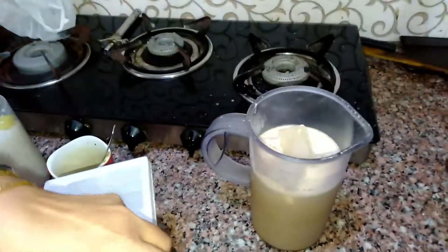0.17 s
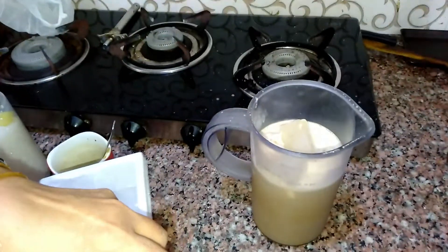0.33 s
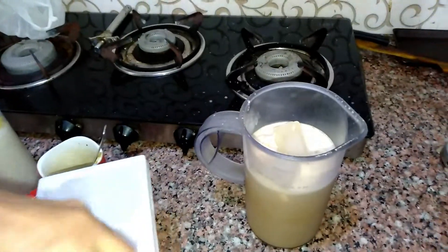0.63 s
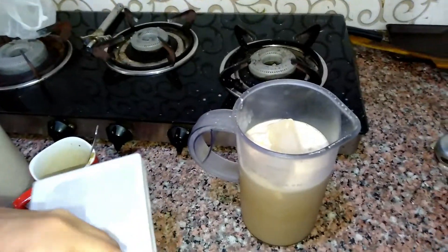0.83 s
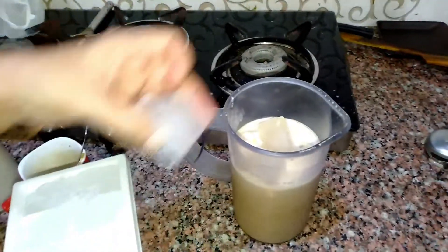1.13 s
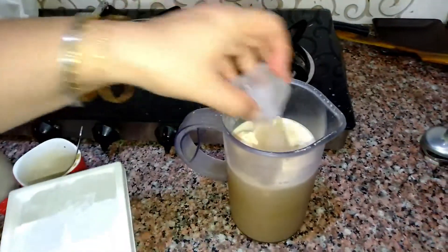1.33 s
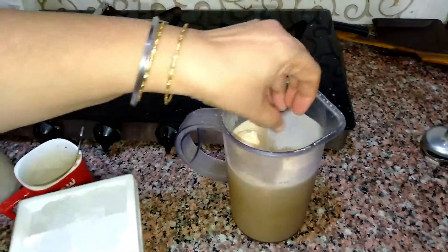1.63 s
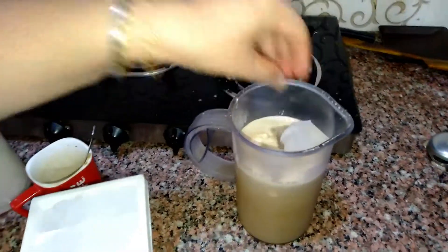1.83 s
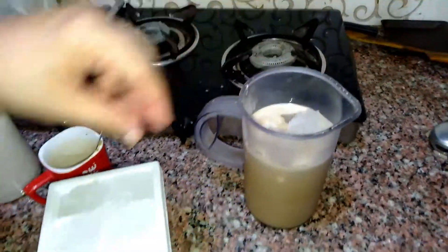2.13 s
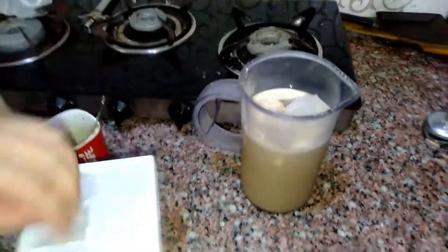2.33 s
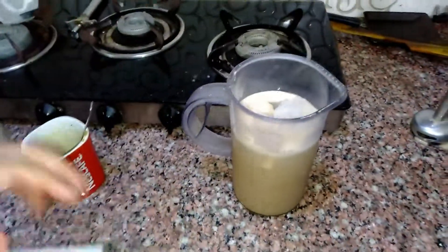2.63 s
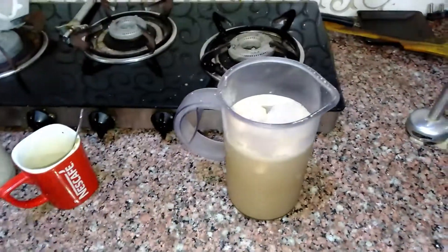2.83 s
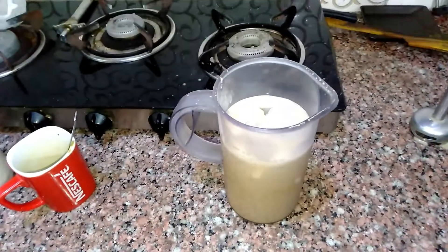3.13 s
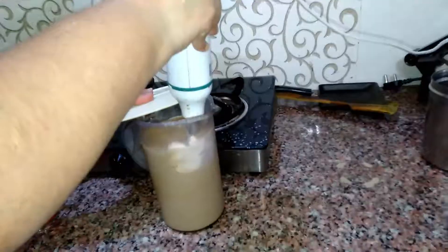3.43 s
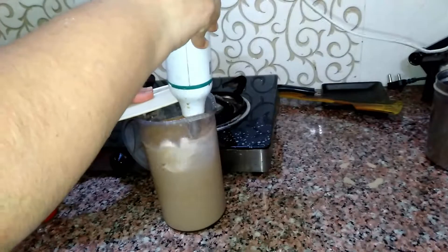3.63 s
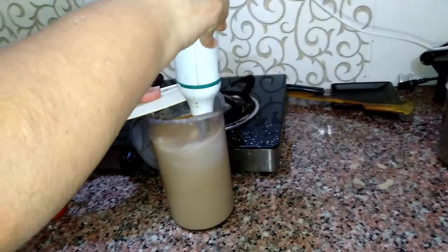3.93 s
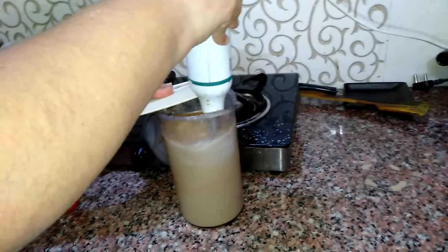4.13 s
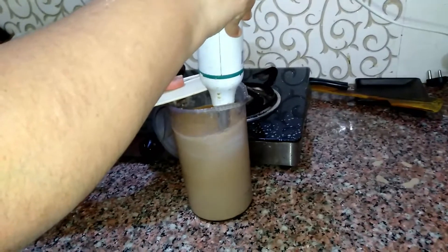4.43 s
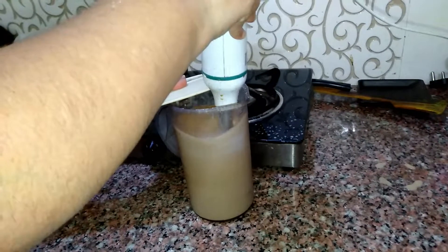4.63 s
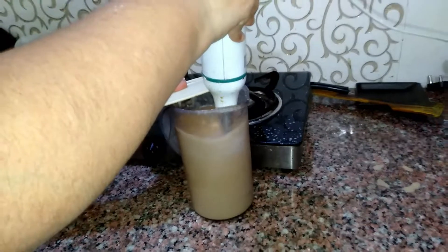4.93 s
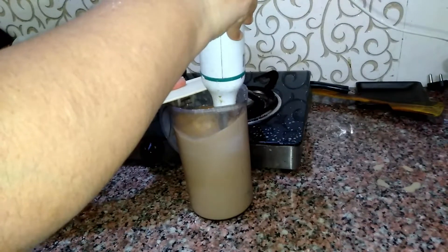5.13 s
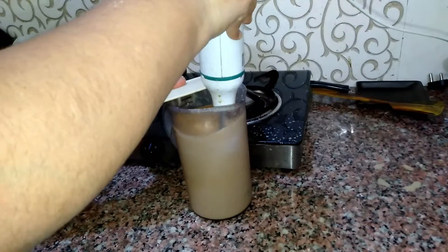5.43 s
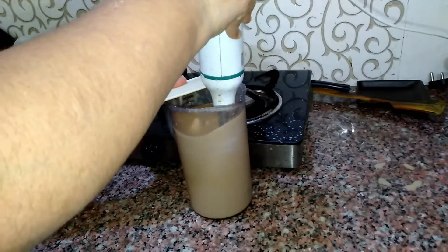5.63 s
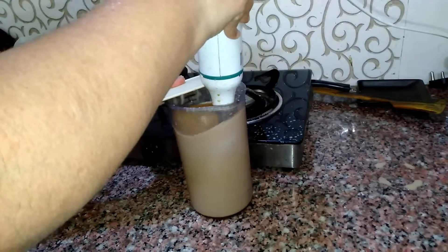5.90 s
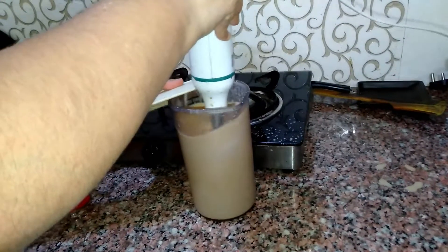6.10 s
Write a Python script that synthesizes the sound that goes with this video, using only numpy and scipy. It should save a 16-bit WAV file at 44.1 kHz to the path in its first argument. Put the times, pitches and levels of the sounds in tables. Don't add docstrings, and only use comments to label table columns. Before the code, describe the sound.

A home kitchen with hard tiled walls, heard close through a small microphone with edgy treble. From 0 to 0.7 seconds fingers rub wet plastic and dig out ice: scattered sharp cracks, brightest and densest between 0.3 and 0.55, with tiny glassy splinters. Quiet fumbling and faint clatter follow, over low room noise and weak wavering hums. At about 1.62 to 1.7 a cube drops into the jug with a short hollow double knock. Bangles brush faintly; a tray slides and bumps softly near 2.7, then taps quickly at 3.2 to 3.3. At 3.37 a hard cut: a hand blender is already running, loud and continuous, a buzzing motor whine around 210 hertz with strong overtones above a thick roar of churned liquid and fine ice ticking. It wavers and slows slightly, then sags and roughens abruptly at 6.03, still running to the end at about 6.3.

```python
import sys
import numpy as np
from scipy import signal
from scipy.fft import rfft, irfft
from scipy.io import wavfile
from scipy.ndimage import uniform_filter1d

SR = 44100
rng = np.random.default_rng(int(sys.argv[2]) if len(sys.argv) > 2 else 0)


def voltage_ratio(level):
    return 10 ** (np.asarray(level, float) / 20)


def transcribe(u):
    v = np.clip(np.atleast_2d(u).T, -1, 1)
    q = np.round(v * 32767).astype(np.int16)
    wavfile.write(sys.argv[1], SR, q)


N = 276149
T = np.arange(N) / SR
MAINS_RIPPLE_HZ = 100

# t/s, grip of shaft on jug/dB, churning effort/dB
BLENDER_WORK = [(3.37, -7, -18), (3.68, 1.5, -16.5), (3.81, -18, -15.5), (4.05, 3.5, -17.5), (4.16, 0, -17),
                (4.33, -4.5, -16.5), (4.47, 3, -19), (4.76, 3, -17.5), (4.91, 6, -20.5), (5.1, -1, -16.5),
                (5.35, 0.5, -17), (5.57, 4, -20.5), (5.76, 2.5, -17.5), (5.99, 5, -19.5), (6.04, -2, -18.5),
                (6.15, -3.5, -16), (6.26, -13, -18)]


def evened(x):
    return x / np.sqrt(np.mean(x ** 2) + 1e-20)


def read(points, hz):
    f, value = np.transpose(points)
    return np.interp(np.log(hz + 1), np.log(f + 1), value)


def curves(rows):
    s, *columns = np.transpose(rows)
    return [np.interp(T, s, c) for c in columns]


def add(mix, s, sound):
    part = mix[round(s * SR):][:len(sound)]
    part += sound[:len(part)]


def band(x, lo_hz, hi_hz):
    sos = signal.butter(2, [lo_hz, min(hi_hz, SR / 2.1)], "band", fs=SR, output="sos")
    return signal.sosfilt(sos, x)


def drift(rate_hz):
    count = int(N / SR * 60) + 2
    f = np.fft.rfftfreq(count, 1 / 60)
    slow = irfft(rfft(rng.standard_normal(count)) / np.sqrt(1 + (f / rate_hz) ** 4), count)
    return np.interp(T, np.arange(count) / 60, evened(slow))


def hiss(spectrum, patchy_db, streaky_db, peaks=()):
    frames, hz = N // 512 + 5, np.fft.rfftfreq(2048, 1 / SR)
    a, b, patches, streaks = rng.standard_normal((frames, 1025, 4)).T
    patches = uniform_filter1d(patches, size=14, axis=0)
    patches = evened(uniform_filter1d(patches, size=8, axis=1))
    streaks = evened(uniform_filter1d(streaks, size=20, axis=1))
    peaks_db = sum(db / (1 + (2 * (hz - f) / width) ** 2) for f, width, db in peaks)
    shape_db = read(spectrum, hz) + peaks_db
    z = (a + 1j * b) * voltage_ratio(shape_db[:, None] + patchy_db * patches + streaky_db * streaks)
    return signal.istft(z, nperseg=2048, noverlap=1536)[1][:N]


def kitchen():
    # f/Hz, level/dB
    room = [(12, -29), (20, -29), (49, -0.5), (274, -17), (532, -13), (621, -16.5), (1030, -19.5),
            (1180, -9.5), (1380, -12.5), (1480, -58), (1880, -13), (2570, -43), (4000, -22.5), (5200, -39),
            (8800, -120)]
    # t/s, level/dB
    rumble = [(0, -58.5), (1, -54), (2, -56.5), (3, -52.5), (3.3, -50)]
    # start/s, end/s, f/Hz, level/dB
    hums = [(0.3, 1.557, 223.7, -63), (0.298, 1.5, 563, -59), (1.907, 3.1, 1145, -59.5),
            (1.8, 3.2, 1250, -62), (2.2, 3.2, 1330, -61), (2.2, 3.2, 1405, -62), (.07, 0.178, 422, -48.5),
            (1.786, 3.3, 216.4, -65)]
    out = voltage_ratio(-54.5) * evened(hiss(room, 2.0, 3.5))
    out += voltage_ratio(curves(rumble)[0]) * evened(band(rng.standard_normal(N), 16.5, 33.4))
    for start, end, hz, db in hums:
        swell = np.clip(np.minimum(T - start, end - T) / 0.035, 0, 1)
        high = hz > 1000
        level_db = db - 1.0 + (3 + 2.5 * high) * drift(7)
        phase = 2 * np.pi * hz * T + (.6 + .9 * high) * drift(8.2)
        out += swell * voltage_ratio(level_db) * np.cos(phase)
    return out


def rubbing():
    # t/s, level/dB
    pressure = [(0.0, -48.5), (0.19, -49.5), (0.4, -42), (0.51, -34), (0.6, -39), (0.72, -50),
                (1.02, -53.5), (1.6, -51), (1.8, -56), (2.3, -52.5), (3.0, -54), (3.37, -52)]
    bright_db = curves(pressure)[0]
    over_rest_db = bright_db + 54.5
    dull_db = -53 + 0.86 * over_rest_db
    flicker_db = np.array([
        np.clip(9.0 + 0.24 * over_rest_db, 0, 9) * np.minimum(drift(30), 1.6),
        4.5 * np.minimum(drift(17), .9),
        1.0 * drift(30),
        3.9 * drift(15)])
    grains = rng.standard_normal((4, N)) * voltage_ratio(flicker_db)
    bright = evened(band(grains[0], 4200, 14300))
    bright += voltage_ratio(5.5) * evened(band(grains[2], 2700, 21000))
    bright += evened(band(grains[2], 9600, 18600))
    dull = evened(band(grains[1], 800, 1700)) + evened(band(grains[3], 1370, 2760))
    return voltage_ratio(bright_db - 12.0) * bright + voltage_ratio(dull_db - 8.0) * dull


def splinters():
    # t/s, peak level/dB
    ticks = [(0.0456, -31), (0.3108, -31), (0.3238, -15), (0.3308, -11.5), (0.3407, -21), (0.3647, -11),
             (0.4003, -12), (0.4219, -25), (0.4635, -21), (0.5158, -17.5), (0.5301, -5.5), (0.5435, -13),
             (0.6568, -31), (0.7374, -35), (0.7516, -31), (1.1851, -29)]
    out, t = np.zeros(N), np.arange(1500) / SR
    decay = voltage_ratio(-60 * t / .0028) + voltage_ratio(-22 - 60 * t / .05)
    for s, db in ticks:
        tick = band(rng.standard_normal(len(t)) * decay, 9000, 15000)
        add(out, s + .0012, voltage_ratio(db - 1.5) * tick / abs(tick).max())
    return out


def knocks():
    # t/s, peak level/dB, ring f/Hz, rattle level/dB
    ice_cracks = [(0.0493, -17, 2700, -9.5), (0.1591, -37, 1300, 2.5), (0.196, -15.5, 1230, -1),
                  (0.3233, -11, 2540, -12), (0.3312, -12, 2590, -12), (0.3424, -17.5, 2300, 2.5),
                  (0.3467, -26, 2650, 2), (0.3495, -17.5, 1920, 0.5), (0.4, -6.5, 2690, -24),
                  (0.4222, -20, 2350, -7), (0.426, -7, 2930, -20), (0.4307, -23, 1960, -7),
                  (0.443, -24, 1680, -17), (0.4634, -30, 1080, -14), (0.5306, -18, 1600, -5),
                  (0.54, -23, 1920, 4.5), (0.5443, -7, 2950, -15.5), (0.574, -20, 1310, -16),
                  (0.67, -31, 1790, 2)]
    # t/s, peak level/dB, ring f/Hz, body level re snap/dB
    cube_bumps = [
        (0.365, -11.5, 2450, -6.5),
        (0.5676, -21, 1480, -5.5),
        (1.3973, -52, 1310, 5),
        (1.619, -35.5, 1060, 4.5),
        (1.642, -39, 1040, -9),
        (1.6852, -16, 960, -6),
        (1.765, -42, 1290, 0),
        (2.7105, -32.5, 1890, -4),
        (3.28, -32, 2090, -19),
    ]
    middling_db, bump_top_db, bump_rattle_db = -18, -13, -13
    ping_hz, ping_t60_s, ping_db = 6860, 0.0073, 1.5
    out, t = np.zeros(N), np.arange(7000) / SR
    rows = [(s, db, hz, -18.5 - 0.28 * (db - middling_db), -15 - 0.085 * (db - middling_db), rattle_db)
            for s, db, hz, rattle_db in ice_cracks]
    rows += [(*row, bump_top_db, bump_rattle_db) for row in cube_bumps]
    for s, snap_db, hz, body_db, top_db, rattle_db in rows:
        noise = rng.standard_normal(len(t))
        flicker = evened(uniform_filter1d(rng.standard_normal(len(t)), size=70))
        crackle = voltage_ratio(rattle_db - 60 * t / 0.073 + 4.6 * np.minimum(flicker, 1.7))

        snap = evened(band(noise, 3240, 8900))
        snap += voltage_ratio(top_db + 16.5) * evened(band(noise, 10200, 21000))
        tick = t / .0004 * np.exp(1 - t / .0004)
        tick *= 1.9 / abs(snap * tick).max()

        modes_hz = hz * np.array([0.98, 0.79, 1.46, 1.87]) * rng.uniform(1.0, 1.04, 4)
        blow = sum(np.sin(2 * np.pi * f * t) for f in modes_hz)
        blow *= voltage_ratio(-60 * t / .009) * np.minimum(t / .0006, 1)
        blow += voltage_ratio(4.5) * crackle * evened(band(noise, 0.79 * hz, 1.58 * hz))

        ping = np.sin(2 * np.pi * ping_hz * rng.uniform(0.937, 1.066) * t)
        ping *= voltage_ratio(ping_db - 60 * t / ping_t60_s) * np.minimum(t / 0.00061, 1)

        knock = voltage_ratio(snap_db - 8.5) * (snap * (.5 * tick + crackle) + ping)
        knock += voltage_ratio(snap_db + body_db + 1.0) * blow
        add(out, s + 0.00066, knock)
    return out


def taps():
    # t/s, peak level/dB
    fumbles = [
        (0.159, -41),
        (0.4264, -31),
        (1.1854, -53),
        (1.3987, -48),
    ]
    # t/s, peak level/dB
    scrapes = [
        (2.6703, -52),
        (2.7117, -29),
    ]
    # t/s, peak level/dB
    tray_taps = [
        (3.225, -42),
        (3.2343, -36),
        (3.247, -31),
        (3.259, -29),
        (3.2676, -28),
        (3.2755, -29),
        (3.2807, -28),
    ]
    t60_s = .007
    out, t = np.zeros(N), np.arange(600) / SR
    for s, db in tray_taps + scrapes + fumbles:
        tap = band(rng.standard_normal(len(t)), 1400, 4000) * voltage_ratio(-60 * t / t60_s)
        add(out, s + 0.00099, voltage_ratio(db - 1) * tap / abs(tap).max())
    return out


def thuds():
    # t/s, f/Hz, t60/s, peak level/dB
    wall_tones = [(1.6198, 1100, .011, -15.5), (1.6198, 2100, .008, -29), (1.6245, 1150, .014, -31),
                  (1.629, 800, .02, -35), (1.6415, 1020, .011, -28), (1.653, 1000, .015, -35),
                  (1.6765, 1080, .012, -24.5), (1.6855, 1850, .014, -24), (1.6876, 950, .022, -25),
                  (1.69, 770, .028, -25), (1.6945, 1100, .02, -31), (1.702, 850, .025, -33),
                  (1.709, 780, .03, -33), (1.716, 900, .02, -37), (0.5305, 1600, .016, -24),
                  (.203, 900, .04, -32), (.81, 900, .09, -47), (.876, 920, .12, -49),
                  (1.3975, 1350, .045, -41), (2.7125, 2300, .018, -34), (2.7635, 1300, .014, -37),
                  (2.773, 1400, .016, -38), (2.82, 1400, .016, -38), (3.2345, 2300, .01, -37),
                  (3.268, 4000, .008, -33), (.965, 1300, .12, -48), (2.2, 1900, .05, -47),
                  (2.58, 1250, .08, -47), (2.81, 2900, .04, -50), (2.937, 1600, .06, -46),
                  (3.057, 1400, .05, -47), (3.108, 1900, .06, -49)]
    out, t = np.zeros(N), np.arange(4000) / SR
    for s, hz, t60_s, db in wall_tones:
        attack = np.minimum(t / 0.0007, 1)
        add(out, s, voltage_ratio(db - 60 * t / t60_s) * np.sin(2 * np.pi * hz * t) * attack)
    return out


def swishes():
    # start/s, length/s, f/Hz, level/dB
    clatter = [(0.271, 0.048, 1350, -47.5), (.49, 0.098, 1300, -42), (0.663, 0.098, 1730, -47),
               (.8, .06, 1300, -51), (0.873, 0.076, 1100, -53), (0.929, 0.065, 1850, -49.5),
               (1.12, 0.043, 1900, -55), (1.27, 0.072, 3800, -53.5), (1.379, .08, 1420, -48),
               (1.398, .04, 1480, -50), (1.484, 0.062, 2000, -59), (1.493, 0.049, 3000, -58),
               (1.571, 0.035, 2200, -48), (1.578, .05, 3300, -55), (1.635, 0.055, 1000, -50),
               (1.7, 0.067, 800, -51), (1.948, 0.16, 1700, -54), (2.07, .05, 3300, -60),
               (2.198, 0.048, 1750, -50), (2.48, 0.043, 1400, -52), (2.566, 0.07, 1600, -50),
               (2.698, 0.2, 1350, -52), (2.927, .04, 1660, -54), (3.052, 0.034, 1700, -51.5)]
    # start/s, length/s, f/Hz, level/dB
    slides = [
        (1.622, .13, 200, -55),
        (2.273, .1, 2200, -56),
        (2.704, .12, 2820, -48.5),
        (2.68, .16, 8950, -49),
        (2.898, .25, 140, -51),
        (3.2, .15, 9000, -56),
        (3.254, .09, 2600, -47),
    ]
    # start/s, length/s, f/Hz, level/dB
    touched = [(0.85, 0.067, 1140, -62), (0.93, 0.084, 1850, -61), (0.96, 0.085, 1300, -51),
               (0.97, 0.12, 1560, -52), (1.15, 0.083, 907, -52), (1.24, 0.091, 2370, -55),
               (1.281, .2, 1280, -58), (1.37, .1, 1940, -63), (1.491, .07, 3030, -58),
               (1.49, 0.082, 1050, -53), (1.57, .05, 2400, -52), (1.58, 0.072, 3280, -56),
               (2.26, .1, 1320, -59), (2.482, 0.1, 1430, -64), (2.58, .08, 1190, -54),
               (2.718, .13, 1350, -61)]
    # start/s, f/Hz, level/dB
    bangles = [(0.918, 6500, -58.5), (1.362, 6400, -58), (1.453, 6900, -60), (1.5, 6900, -68),
               (1.823, 5800, -68), (1.93, 6500, -68), (1.85, 4100, -64), (2.05, 6300, -65),
               (2.2, 7040, -66), (2.35, 6600, -64), (2.55, 5100, -61)]
    bangle_s = .047
    out = np.zeros(N)
    rows = [(*row, 0.32) for row in clatter] + [(*row, .98) for row in slides]
    rows += [(*row, .075) for row in touched]
    rows += [(s, bangle_s, hz, db, .17) for s, hz, db in bangles]
    for s, length_s, hz, db, share in rows:
        width_hz = share * hz
        centre_hz = np.sqrt(hz ** 2 + width_hz ** 2 / 4)
        u = np.linspace(0, 1, round(length_s * SR))
        white = rng.standard_normal(12000)
        flicker = evened(uniform_filter1d(white[::-1], size=110))
        grains = voltage_ratio(2.8 * share * flicker)
        noise = band(white * grains, centre_hz - width_hz / 2, centre_hz + width_hz / 2)
        swell = np.sin(np.pi * u ** 0.58) ** 1.2
        add(out, s, voltage_ratio(db) * evened(noise)[-len(u):] * swell)
    return out


def tiles(x):
    t = np.arange(12000) / SR
    echoes = rng.choice([-1., 1.], len(t)) * (rng.random(len(t)) < 2000 / SR)
    tail = echoes * voltage_ratio(-60 * t / 0.24) * (t > .004)
    return signal.oaconvolve(x, tail / np.linalg.norm(tail))[:N]


def sway_db(order):
    # shaft order, t/s, length/s, change/dB
    sways = [(2, 3.52, .25, 3), (2, 3.77, 0.15, -12), (2, 4.17, 0.13, -12), (2, 4.9, .2, 2),
             (2, 5.8, 0.17, 4), (2, 5.93, .16, 6), (2, 6.18, 0.19, -6), (3, 4.5, 0.074, -12),
             (3, 4.6, .1, 4.5), (3, 4.4, 0.061, -6), (3, 5.11, .08, -6), (3, 5.85, 0.16, 4.5),
             (3, 6.07, 0.06, -6), (4, 3.42, .08, -5), (4, 3.55, .1, 1.5), (4, 3.65, .07, -8),
             (4, 3.7, .05, 3), (4, 3.95, .03, -4), (4, 5.72, .07, 4), (4, 4.35, 0.087, -7),
             (4, 5.4, 0.072, 4), (4, 4.75, .05, -5), (4, 5.07, .05, -10), (4, 5.7, 0.043, -12),
             (4, 5.25, .05, 3.5), (4, 5.3, 0.044, -13), (4, 5, .05, -3.5), (4, 5.53, 0.06, 4.5),
             (4, 6.07, 0.066, -2), (5, 4.52, .2, 4.5), (5, 4.68, .06, -8), (5, 4.97, .05, -8),
             (5, 5.13, .05, -8), (5, 5.2, .08, 4), (5, 5.36, 0.093, 7), (5, 5.55, 0.064, -12),
             (5, 5.4, .14, -12)]
    return sum(db * np.exp(-(1.67 * (T - s) / length_s) ** 2)
               for k, s, length_s, db in sways if round(k) == order)


def motor():
    # t/s, f/Hz
    shaft_speed = [(3.37, 211.2), (3.7, 211.7), (3.95, 209.9), (4.14, 210.5), (4.4, 209.9), (4.85, 207.2),
                   (5.02, 208.1), (5.15, 205.2), (5.33, 205.5), (5.46, 207.5), (5.68, 208.7), (5.9, 209.2),
                   (6.0, 206.9), (6.03, 195.4), (6.1, 193.1), (6.18, 194.9), (6.26, 194.9)]
    # t/s, f/Hz, level/dB
    bearing_whirl = [(3.37, 90, -40), (3.61, 85.8, -40.5), (4.5, 80.7, -53), (4.74, 84, -52),
                     (4.8, 82.5, -35), (5.0, 81.9, -40), (5.21, 69.9, -45), (5.4, 68.7, -48),
                     (5.5, 79.9, -44), (5.8, 79.6, -46), (5.98, 81.3, -51), (6.22, 82.6, -46)]
    # shaft order, level/dB, share of grip, slope/(dB/s), change in sag/dB
    loud_orders = [
        (2, -30, 0.02, -2.5, -1),
        (3, -28, 0.0017, 2, 1),
        (4, -17, 0.9, -0.96, -2),
        (5, -22, 0.02, 1.3, -1.5),
    ]
    # shaft order, level/dB, slope/(dB/s)
    weak_orders = [(1, -38, -1), (4.5, -31.5, 5), (5.5, -36.5, 8.5), (6, -30, -3.5), (7, -31, -3.5),
                   (8, -31.5, -5.5), (9, -30, -1), (10, -31, -3.5), (11, -31.5, -2), (12, -39, -2),
                   (13, -37, 1), (14, -56, 1), (15, -40.5, -2), (16, -47, -6.5), (17, -40.5, -3.5),
                   (18, -40.5, -2), (19, -53, -4), (20, -44, -1), (21, -52, 3)]

    shaft_hz, grip_db = curves(shaft_speed)[0], curves(BLENDER_WORK)[0]
    load = np.clip((207.5 - shaft_hz) / 12, 0, 1)
    since_s = T - 4.8
    orders = [(k, db + share * grip_db + slope * since_s + sag_db * load + sway_db(round(k)) + 0.57 * drift(2.4))
              for k, db, share, slope, sag_db in loud_orders]
    orders += [(k, db + slope * since_s) for k, db, slope in weak_orders]

    turn = 2 * np.pi * np.cumsum(shaft_hz * (1 + .001 * drift(12))) / SR
    mains = 2 * np.pi * MAINS_RIPPLE_HZ * T
    whirl_hz, whirl_db = curves(bearing_whirl)
    whirl = 2 * np.pi * np.cumsum(whirl_hz) / SR

    tone = voltage_ratio(whirl_db + 0.5 + 2.3 * drift(10)) * np.cos(whirl + 0.4 * drift(7.4))
    tone += voltage_ratio(-51.0 + 1.7 * drift(3.9)) * np.cos(turn - whirl)
    tone += voltage_ratio(-48.5 + 4.4 * drift(2.97)) * np.cos(mains)
    tone += load * voltage_ratio(-34.5 + 2.9 * drift(14)) * np.cos(turn)
    for k, db in orders:
        angle = round(2 * k) / 2 * turn + 7 * rng.random()
        sides = voltage_ratio(-15 + 2.5 * drift(6.8)) * np.cos(angle + mains)
        sides += voltage_ratio(-30.0 + 4.0 * drift(4.5)) * np.cos(angle - mains)
        sides += voltage_ratio(-22.5 + 3.5 * drift(7.0)) * np.cos(angle + whirl * (k > 1.5))
        line = voltage_ratio((0.9 + 1.1 * load) * drift(8.0)) * np.cos(angle + (0.075 + 0.57 * load) * drift(27))
        tone += voltage_ratio(db + 2.5) * (line + sides)
    return tone, turn


def churn(turn):
    # f/Hz, level/dB
    liquid = [(40, -59), (70, -41), (150, -36.5), (240, -30), (330, -24), (450, -17), (700, -13.5),
              (900, -11.5), (1100, -12), (1400, -12.5), (2400, -15.5), (3000, -22.5), (5000, -29),
              (16000, -31.5)]
    # f/Hz, width/Hz, level/dB
    jug_walls = [(205, 24, 15.5), (231, 12.4, 18.5), (503, 410, 1.5), (833, 20, -6), (846, 60, 4.5),
                 (927, 143, 6), (1147, 12, 4), (1315, 16, 8), (1374, 23, 7.5), (1568, 43, 6.5),
                 (1036, 32, 4), (2910, 240, -1), (3930, 1500, 4), (737, 28, -14), (290, 35, -2.5)]
    # share of effort, share of grip, slow waver/dB
    follow = [
        (1, -0.45, 1.5),
        (0.47, -0.6, 1),
        (0.51, -0.26, 0.42),
    ]

    grip_db, effort_db = curves(BLENDER_WORK)
    tight_db = np.maximum(grip_db, 0)
    shares_db = [(effort - 1) * effort_db + grip * tight_db + waver_db * drift(8.1)
                 for effort, grip, waver_db in follow]

    roar = hiss(liquid, .9, 2.9, jug_walls)
    roar *= 1 + 0.074 * np.cos(turn)
    roar *= 1 + 0.014 * np.cos(2 * np.pi * MAINS_RIPPLE_HZ * T)
    roar *= voltage_ratio(0.9 * drift(22))
    roar /= np.std(band(roar, 1260, 2170))

    chips = voltage_ratio(0.65 * np.minimum(rng.exponential(1, N), 4))
    chips *= (rng.random(N) < 500 / SR) * rng.choice([-1, 1], N)
    roar += voltage_ratio(-14.5) * evened(band(chips, 810, 5200))

    parts = band(roar, 100, 780), band(roar, 830, 1050), band(roar, 3000, 21000)
    change = sum((voltage_ratio(db - db[-2 * SR:].mean()) - 1) * part for db, part in zip(shares_db, parts))
    return voltage_ratio(effort_db) * (roar + change)


def scene():
    change_s = 3.372
    hits = knocks() + splinters() + thuds() + taps()
    ice = hits + voltage_ratio(-7.5) * tiles(hits) + rubbing() + swishes() + kitchen()
    tone, turn = motor()
    return np.where(T < change_s, ice, tone + churn(turn))[None]


def top_cut(x):
    return signal.sosfilt(signal.butter(12, 17130, fs=SR, output="sos"), x)


def record(dry):
    # f/Hz, level/dB
    mic = [(1500, -0.5), (5000, -1), (5700, 1.5), (6800, 7), (8000, -1.5), (9700, -8), (11400, -5),
           (12200, -0.5), (13000, -7), (14500, 0), (15600, 6), (17000, 15)]
    log_gain = np.log(voltage_ratio(read(mic, abs(np.fft.fftfreq(2048, 1 / SR)))))
    impulse = np.fft.ifft(np.exp(log_gain - 1j * signal.hilbert(log_gain).imag)).real[:1024]
    x = signal.oaconvolve(dry, impulse[None])[:, :N]
    x = x / (1 + abs(x) ** 8) ** (1 / 8)
    edge_hz = 15770
    edge = signal.firwin(3001, edge_hz, window=("kaiser", 11), fs=SR)
    mix = signal.oaconvolve(x, edge[None], "same")
    return top_cut(mix)


dry = scene()
out = record(dry)
transcribe(out)
```